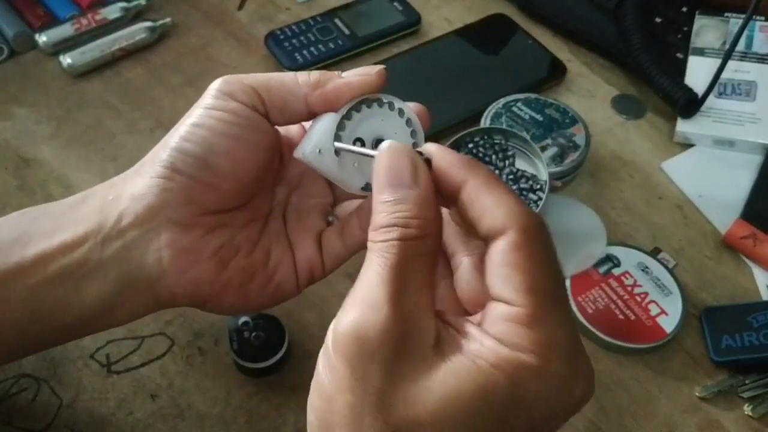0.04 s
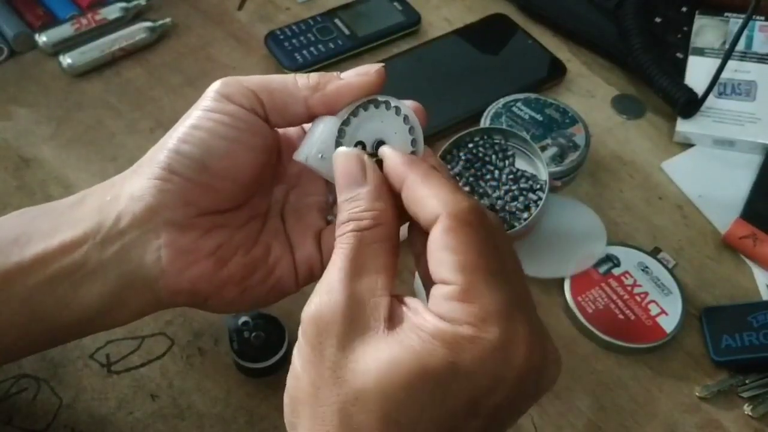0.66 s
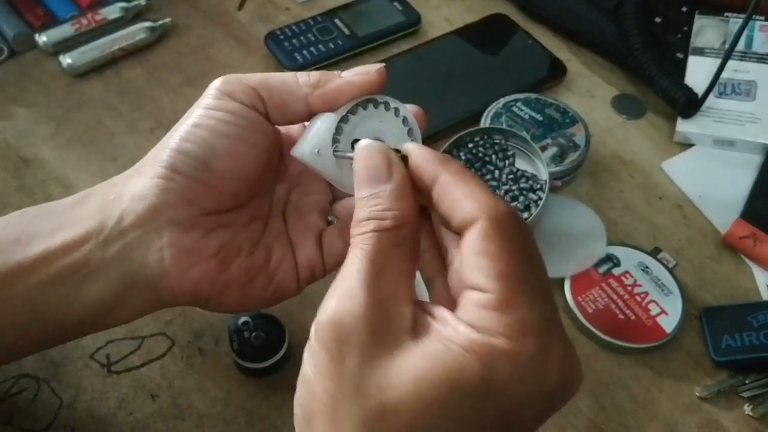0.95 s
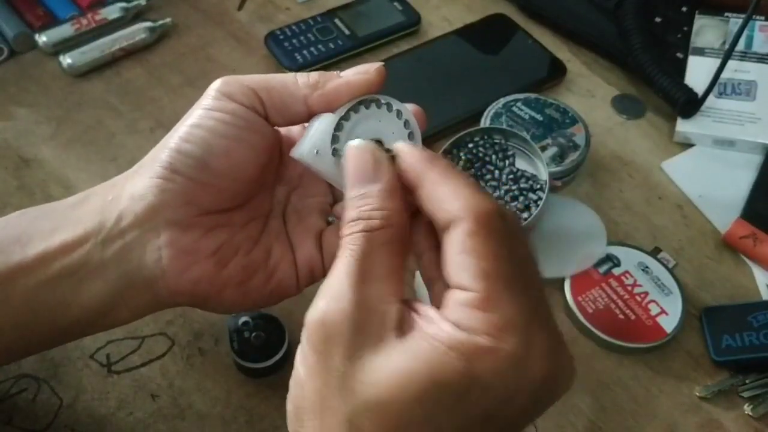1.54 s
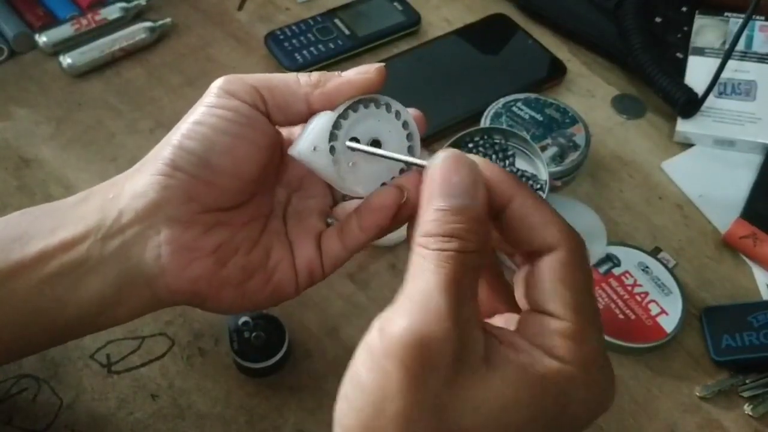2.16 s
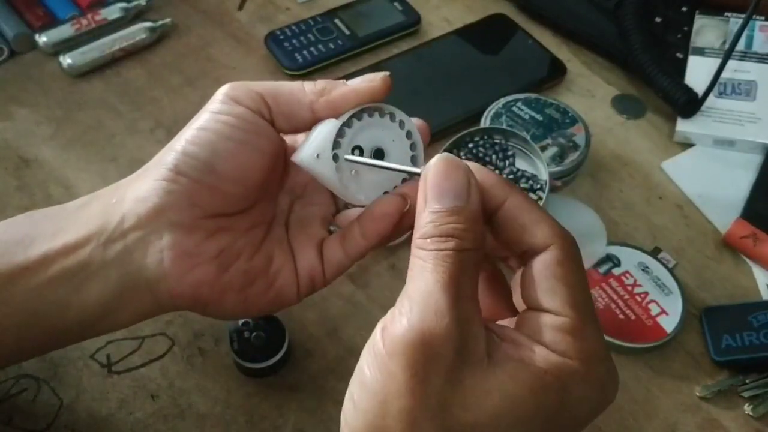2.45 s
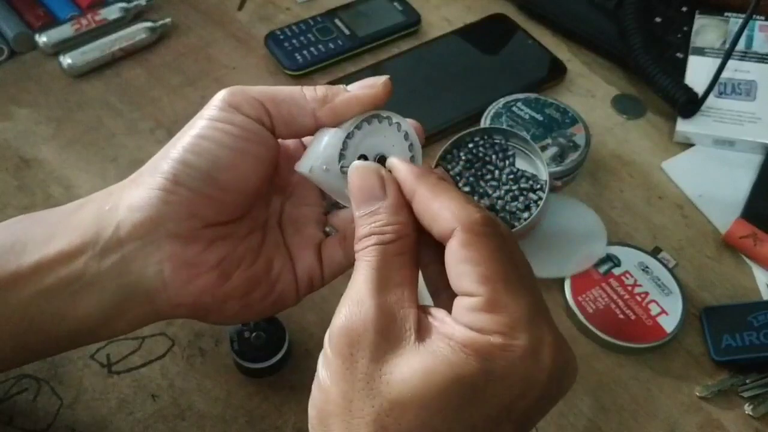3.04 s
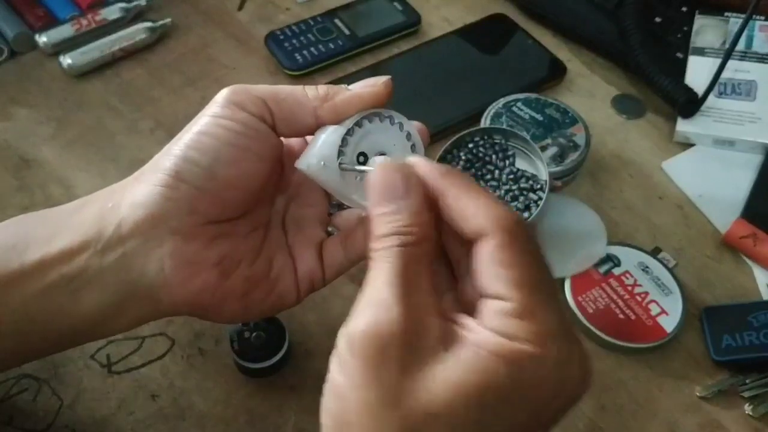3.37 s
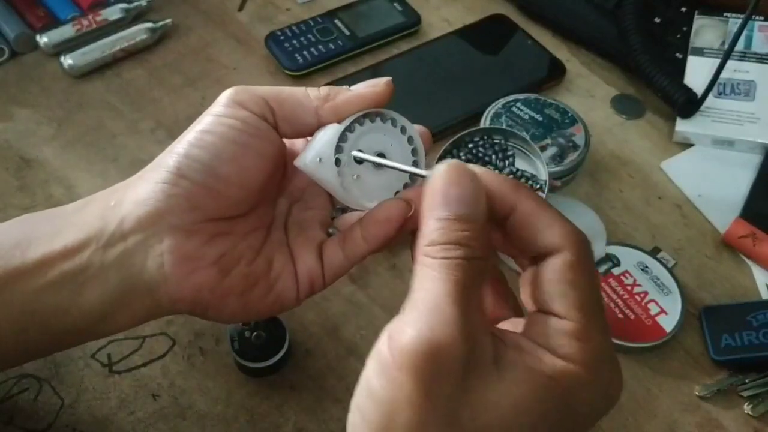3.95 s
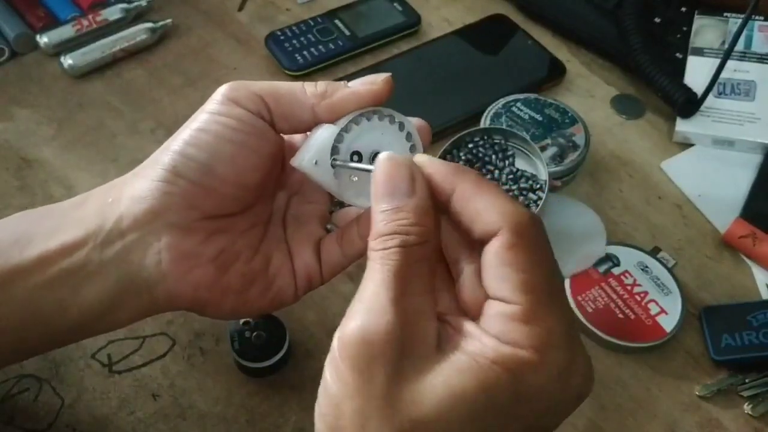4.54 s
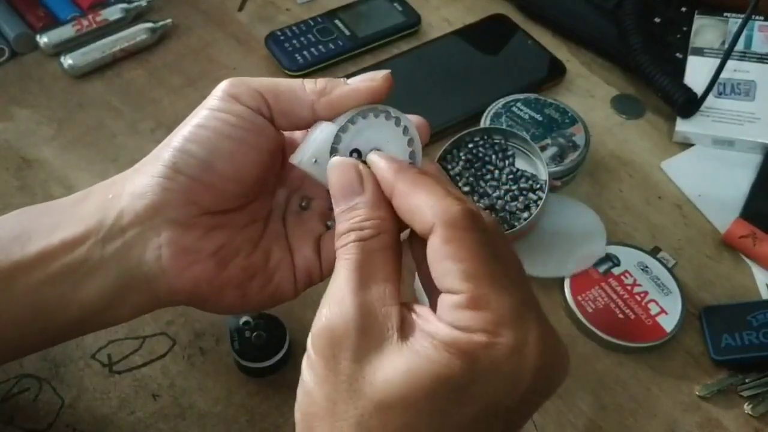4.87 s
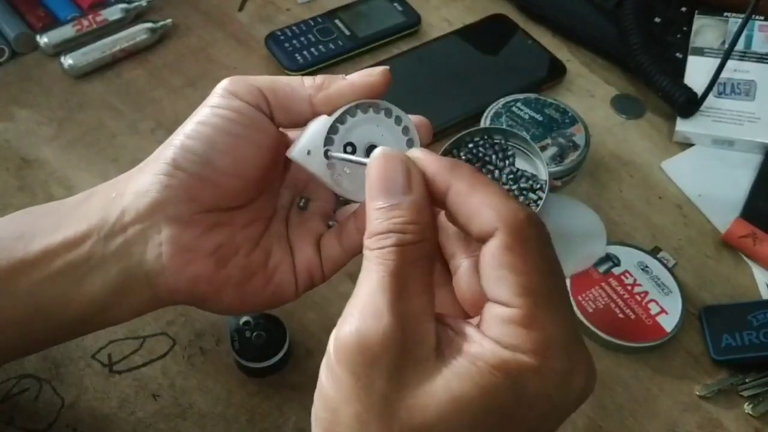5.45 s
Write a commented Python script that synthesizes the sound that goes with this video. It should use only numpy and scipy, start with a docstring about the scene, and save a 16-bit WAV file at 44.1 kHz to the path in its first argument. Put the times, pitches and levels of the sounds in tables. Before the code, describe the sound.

Close to the microphone, a plastic and metal pellet magazine clicks sharply every half second to a second or so while being loaded. Some clicks are doubled, and two leave a short metallic ring. Between them come soft hollow taps, pellet ticks and short plastic rubs, and a few light taps finish the sequence. A small room adds a short echo, with quiet rumble and hiss underneath.

```python
"""In a small, echoing room, pellets are thumbed into a hand-held rotary magazine, heard close up.
Its cover and its spring-loaded rotor (the wheel that holds the pellets) scrape round and snap against
their stops, which makes the plastic and metal parts ring. Pellets tick lightly in the chambers.
Behind it all lie a low room rumble, a faint hum that comes and goes, and hiss."""
import sys
import numpy as np
from scipy import signal
from scipy.fft import rfft, irfft
from scipy.io import wavfile
from scipy.ndimage import uniform_filter1d

SR = 44100
rng = np.random.default_rng(int(sys.argv[2]) if len(sys.argv) > 2 else 0)


def dump_mix(stems):
    """Bounce the given channels to the path in sys.argv[1] as a 16-bit WAV at rate SR."""
    frames = np.atleast_2d(stems).T  # one column per channel
    limited = np.clip(frames, -1, 1)  # hard clip at full scale
    pcm = np.round(limited * 32767).astype(np.int16)
    wavfile.write(sys.argv[1], SR, pcm)


N = 251811
TIME = np.arange(N) / SR

# hard snaps of the rotor: time_s, force_db, metal_db, rotor_pitch_hz, room_boost_db
SNAPS = [ (0.0434, 2, -15.5, 4030, -3), (0.6552, -5, -16.5, 4000, -13), (0.6694, -2, -14.5, 3840, 3.5),
         (1.1144, 1.5, -13.5, 3800, -3), (1.676, 0.5, -19.5, 3610, -7.5), (2.085, 3.5, -13, 3280, -2),
         (2.8726, 1, -20.5, 3900, -15), (2.8787, -2.5, -17, 4180, -2.5), (3.4801, 4, -14, 3750, -3),
         (4.7037, -2.5, -19, 3860, -6), (4.711, -2.5, -19.5, 3930, -3), (5.0888, 4.5, -14, 3370, -3.5)]
# light touches: time_s, level_db, hardness (0 is a dull tap on plastic, 1 is a metal tick)
TICKS = [ (.556, -44, .05), (.628, -30, 0.42), (0.6432, -30.5, 0.36), (0.728, -32, 1), (0.9675, -40, .35),
         (1.5, -34, .15), (1.578, -34, 0.94), (1.626, -37, 1), (2.7708, -33, 0.045), (2.7822, -35, 0.076),
         (2.852, -35, .45), (2.856, -27.5, .5), (3.44, -35.5, 0.86), (3.454, -34, 1), (4.449, -49, 0),
         (4.561, -45.5, .03), (4.6053, -32.5, .05), (4.616, -39, 0.87), (4.678, -29.5, .1), (4.684, -30, 1),
         (5.0175, -36, .03), (5.06, -41.5, 0.92), (5.5864, -37.5, .2), (5.621, -28.5, 0.24),
         (5.695, -30, 0.49), (5.6993, -26.5, 0.47)]
# the cover rubbing as it turns: start_s, end_s, start_db, end_db, shell_over_rotor_db
RUBS = [(1.597, 1.631, -42, -33.5, 0.5), (3.307, 3.428, -60.5, -38, 5), (3.436, 3.476, -37.5, -45, -1),
        (4.673, 4.691, -37.5, -29, 0), (5.009, 5.062, -50, -51, 1)]
# long rings that follow two of the snaps: start_s, pitch_hz, width_hz, level_db, time_to_fade_60_db_s
RINGS = [(.675, 9700, 5400, -31, 0.78), (5.092, 3430, 750, -35.5, 0.83)]
# the tones each part rings at: pitch_hz, width_hz, relative_db, left_over_right_db, left_delay_ms
SHELL_TONES = [(1146, 680, -11, -1, 0.28), (1870, 1100, -2, 1, 0.057), (2130, 410, -2.5, 0.5, 0.12)]   # the plastic shell, hit hard
TAP_TONES = [(1300, 600, -21, -3, .08), (1900, 660, 0, 0, .06)]   # the same shell, touched lightly: a hollow tap
ROTOR_TONES = [(3220, 900, -6.5, -2, 0.11), (3800, 570, -3.5, 9.5, 0.16), (4390, 710, -2.5, 4.5, 0.1),
               (5400, 1900, -11.5, 0.5, 0.073)]
METAL_TONES = [(7900, 2700, 5, -2, 0.002), (8890, 900, -2, -12, 0.054), (11800, 1540, 2, -4, 0.032),
               (13700, 3460, -4, -6.5, 0.045)]
# how strong the room's echo is, from low to high: pitch_hz, relative_db
ROOM_COLOUR = [(300, -7), (1000, 1.5), (2000, -2.5), (4000, -1), (6000, 0), (7600, -2), (10500, 2),
               (15000, 0.5)]
# how long the room's echo lasts: pitch_hz, time_to_fade_60_db_s
ROOM_FADE = [(300, 0.47), (2000, 0.93), (5000, 0.79), (9000, 0.72), (15000, 0.65)]
# swells of the faint hum: middle_s, half_length_s, pitch_hz, level_db
HUMS = [(0.475, 0.12, 265.6, -45), (0.81, 0.11, 268.6, -53), (1.128, 0.47, 268.7, -56),
        (2.303, 0.17, 303, -57.5), (3.314, 0.14, 338.5, -54.5)]
# the background noise, from rumble up to hiss: pitch_hz, relative_db
NOISE_COLOUR = [(18, -93), (30, -37), (95, -25.5), (140, -14.5), (182, -7.5), (219, -4), (277, -7.5),
                (307, -10.5), (332, -12), (575, -12.5), (852, -20.5), (1170, -19), (2020, -22), (2690, -22),
                (15500, -29)]
# how alike that noise is left and right: pitch_hz, likeness (0 or less is unrelated, 1 is the same)
NOISE_LIKENESS = [(60, 0.89), (180, 0.89), (550, 0.42), (1650, -0.37), (4970, -1.16), (15000, -0.02)]

HIT_SAMPLES, LEAD_SAMPLES = 2048, 640   # the length of one hit, and the part before the blow lands
HIT_TIME = (np.arange(HIT_SAMPLES) - LEAD_SAMPLES) / SR   # seconds, with the blow at 0


def rotor_snaps():
    """The spring drives the rotor into its stop. The hands move, so each snap has its own echoes."""
    out = np.zeros((2, N))
    for time_s, force_db, metal_db, rotor_hz, room_boost_db in SNAPS:
        parts = [(SHELL_TONES, 1, -20.5 + 0.73 * force_db, .0011),
                 (ROTOR_TONES, rotor_hz / ROTOR_TONES[1][0], -19.5 + 1.26 * force_db, .0012),
                 (METAL_TONES, 1, metal_db, .0022)]
        slide_s = 0.0069 * 2 ** (force_db / 12)   # a harder snap has slid for longer
        snap = hit(parts, slide_s, scrape_db=-7.5, blow=4.4, apart=0.53, grip_db=1.0)
        # the walls get mostly the all-round average, with a little of the snap's own colour
        to_walls = from_db(-7.5) * snap + from_db(-1.0) * all_round(snap, blur_hz=750)
        start = round(time_s * SR) - LEAD_SAMPLES
        add(out, snap + jolt(-31.5 + 0.51 * force_db, fade_s=0.0069), start)
        add(out, from_db(-9.5) * near_echoes(snap, first_s=0.0012, fade_s=0.027, per_s=1600), start)
        add(out, from_db(room_boost_db - 8.5) * room_echo(to_walls, build_s=0.01), start)
    return out


def jolt(level_db, fade_s):
    """The whole magazine jolts in the hand: a weak, dull puff under the snap."""
    dull = signal.butter(1, [120, 900], "band", fs=SR, output="sos")
    puff = stereo_noise(HIT_SAMPLES, apart=0.24) * np.exp(-np.abs(HIT_TIME) / fade_s)
    return from_db(level_db) * signal.sosfilt(dull, puff)


def rotor_bounces(count, gap_s, first_db, loss_db):
    """After each snap the rotor bounces off its stop, unevenly and more weakly each time."""
    out = np.zeros((2, N))
    for snap_s, *_ in SNAPS:
        gaps = gap_s * (1 + .2 * rng.uniform(-1, 1, count))
        for bounce, time_s in enumerate(snap_s + np.cumsum(gaps)):
            add(out, touch(first_db - loss_db * bounce, hardness=0.89), round(time_s * SR) - LEAD_SAMPLES)
    return out


def long_rings(rise_s, grit_db):
    """A gritty cluster of close, slowly fading tones hangs on after a sharp snap."""
    out = np.zeros((2, N))
    t = np.arange(SR) / SR
    for start_s, hz, width_hz, level_db, fade_s in RINGS:
        band = signal.butter(2, [hz - width_hz / 2, hz + width_hz / 2], "band", fs=SR, output="sos")
        grit = from_db(grit_db * unit_level(uniform_filter1d(rng.standard_normal(SR), size=130)))
        cluster = unit_level(signal.sosfilt(band, grit * stereo_noise(SR, apart=.9)))
        loudness = from_db(level_db - 60 * t / fade_s) * (1 - np.exp(-t / rise_s))
        add(out, cluster * loudness, round(start_s * SR))
    return out


def light_ticks(settle_s, softer_db):
    """Pellets, cover and rotor touch lightly, then settle with a second, fainter tick."""
    out = np.zeros((2, N))
    for time_s, level_db, hardness in TICKS:
        add(out, touch(level_db, hardness), round(time_s * SR) - LEAD_SAMPLES)
        settle = touch(level_db - softer_db, hardness=0.73)
        add(out, settle, round((time_s + settle_s) * SR) - LEAD_SAMPLES)
    return out


def cover_rubs(slips_per_s, spread_db):
    """The cover turns: many tiny slips of plastic on plastic ring the shell, rotor and metal."""
    out = np.zeros((2, N))
    for start_s, end_s, start_db, end_db, shell_db in RUBS:
        length = int((end_s - start_s) * SR)
        slips = (rng.random(length) < slips_per_s / SR) * from_db(spread_db * rng.standard_normal(length))
        force = np.pad(slips * stereo_noise(length, apart=0.7), ((0, 0), (0, LEAD_SAMPLES)))
        rub = 0
        for part_db, tones in (shell_db, TAP_TONES), (0, ROTOR_TONES), (0, METAL_TONES):
            rub = rub + from_db(part_db) * unit_level(ring(force, tones, pitch_ratio=0.97, grip_db=0.75))
        loudness = from_db(np.linspace(start_db, end_db, length + LEAD_SAMPLES))
        add(out, unit_level(rub) * loudness, round(start_s * SR))
    return out


def touch(level_db, hardness):
    """One light tap on the shell. The harder it is, the more the rotor and metal rattle instead."""
    parts = [(TAP_TONES, 1, level_db - 5 * hardness, .0006),
             (ROTOR_TONES, 1, level_db - 10.5 + 9.4 * hardness, .0018),
             (METAL_TONES, 1, level_db - 18.5 + 19 * hardness, .0021)]
    return hit(parts, slide_s=.002, scrape_db=-13, blow=4.0, apart=.18, grip_db=1.5)


def hit(parts, slide_s, scrape_db, blow, apart, grip_db):
    """A growing scrape, a blow and a dying rattle make each part ring."""
    t = HIT_TIME
    loudest = (t > -.0007) & (t < .0033)   # each part's level is set over these 4 ms
    scrape = from_db(scrape_db) * np.sqrt(np.clip(1 + t / slide_s, 0, 1))
    out = 0
    for tones, pitch_ratio, level_db, rattle_s in parts:
        strength = np.where(t < 0, scrape, np.exp(-np.abs(t) / rattle_s))
        force = strength * stereo_noise(HIT_SAMPLES, apart) + blow * (t == 0)
        ringing = ring(force, tones, pitch_ratio, grip_db)
        out = out + from_db(level_db) * ringing / ringing[:, loudest].std()
    return out


def ring(force, tones, pitch_ratio, grip_db):
    """A pushed part rings at its own tones. The fingers muffle each a little differently every time."""
    hz = np.maximum(np.fft.rfftfreq(force.shape[1], 1 / SR), 1)
    side = np.array([[.5], [-.5]])   # left, right
    response = 0
    for pitch_hz, width_hz, level_db, left_db, delay_ms in tones:
        gain = from_db(level_db + side * left_db + grip_db * rng.standard_normal())
        peak = gain / (1 + 1j * (hz - (pitch_ratio * pitch_hz) ** 2 / hz) / width_hz) ** 2
        response = response + peak * np.exp(-2j * np.pi * hz * side * delay_ms / 1000)
    return irfft(rfft(force) * response, force.shape[1])


def all_round(sound, blur_hz):
    """Averaged over all directions, the fine peaks and dips in a hit's tone even out."""
    power = np.mean(np.abs(rfft(sound)) ** 2, axis=0)
    smooth = uniform_filter1d(power, int(blur_hz * HIT_SAMPLES / SR) + 1)
    click = np.roll(irfft(np.sqrt(np.abs(smooth))), LEAD_SAMPLES)
    return np.tile(click, (2, 1))


def near_echoes(sound, first_s, fade_s, per_s):
    """Quick, separate echoes come off the hands, the desk and the things on it."""
    t = np.arange(SR // 8) / SR
    arrivals = (rng.random(len(t)) < per_s / SR) * (t > first_s)
    echoes = stereo_noise(len(t), apart=1.0) * arrivals * np.exp(-t / fade_s)
    return signal.fftconvolve(sound, unit_level(echoes) / np.sqrt(len(t)), axes=1)


def room_echo(sound, build_s):
    """Echoes off the walls blur into a tail that builds up, then fades, lingering in the middle pitches."""
    hz, t, noise = signal.stft(stereo_noise(SR * 3 // 4, apart=.9), SR, nperseg=256)
    fade_db = at_pitch(ROOM_COLOUR, hz)[:, None] - 60 * t / at_pitch(ROOM_FADE, hz)[:, None]
    tail = signal.istft(noise * from_db(fade_db) * (1 - np.exp(-t / build_s)), SR)[1]
    tail = unit_level(tail) / np.sqrt(2 * tail.shape[1])
    from_other_side = signal.fftconvolve(sound[::-1], tail[::-1] * [[1], [-1]], axes=1)
    return signal.fftconvolve(sound, tail, axes=1) + from_other_side


def rumble_and_hiss(level_db, rumble_hz, rumble_width_hz, rumble_boost_db):
    """A low room rumble, much the same in both ears, lies under a steady hiss."""
    hz = np.fft.rfftfreq(N, 1 / SR)
    shared, opposite = rfft(rng.standard_normal((2, N)))
    alike = np.clip(at_pitch(NOISE_LIKENESS, hz), 0, 1)
    noise = np.sqrt(1 + alike) * shared + np.sqrt(1 - alike) * opposite * [[1], [-1]]
    bump_db = rumble_boost_db * np.exp(-((hz - rumble_hz) / rumble_width_hz) ** 2)
    colour = from_db(at_pitch(NOISE_COLOUR, hz) + bump_db)
    return from_db(level_db) * unit_level(irfft(noise * colour, N))


def hum():
    """A faint low tone swells and fades."""
    out = np.zeros(N)
    for middle_s, half_s, hz, level_db in HUMS:
        swell = np.cos(np.pi / 2 * np.clip((TIME - middle_s) / half_s, -1, 1))
        out += from_db(level_db) * np.sqrt(2) * swell * np.sin(2 * np.pi * (hz * TIME + rng.random()))
    return out


def stereo_noise(length, apart):
    """Noise that is the same in both ears (apart=0), unrelated (apart=1) or in between."""
    shared, left, right = rng.standard_normal((3, length))
    return np.sqrt(1 - apart) * shared + np.sqrt(apart) * np.array([left, right])


def from_db(db):
    """Turn decibels into a number to multiply by."""
    return 10 ** (np.asarray(db) / 20)


def unit_level(sound):
    """Scale a sound so that its average (RMS) level is 1."""
    return sound / np.sqrt(np.mean(sound ** 2) + 1e-20)


def at_pitch(table, hz):
    """Read between a table's rows, giving every octave equal space."""
    pitches, values = np.array(table).T
    return np.interp(np.log(np.maximum(hz, 1)), np.log(pitches), values)


def add(out, sound, start):
    """Mix a stereo sound in from a given sample on."""
    first, last = max(start, 0), min(start + sound.shape[1], N)
    out[:, first:last] += sound[:, first - start:last - start]


def scene():
    """The magazine close by, its echoes and the room behind it."""
    quiet = light_ticks(settle_s=0.01, softer_db=13.5)
    quiet += rotor_bounces(count=3, gap_s=.0115, first_db=-29.5, loss_db=3)
    quiet += cover_rubs(slips_per_s=1500, spread_db=0.5)
    out = rotor_snaps() + long_rings(rise_s=0.039, grit_db=0.5) + quiet
    add(out, from_db(-11) * near_echoes(quiet, first_s=.003, fade_s=.02, per_s=2500), 0)
    add(out, from_db(-9.5) * room_echo(quiet, build_s=0.0021), 0)
    out += rumble_and_hiss(level_db=-49.5, rumble_hz=228, rumble_width_hz=87, rumble_boost_db=3.0)
    return out + hum()


def record(dry):
    """Flatten the highest peaks, thin the deep bass and cut the very top of the treble."""
    clipped = np.clip(dry, -1.2, 1.2)
    thinned = signal.sosfilt(signal.butter(1, 35, "high", fs=SR, output="sos"), clipped)
    return signal.sosfiltfilt(signal.butter(24, 15700, "low", fs=SR, output="sos"), thinned)


dry = scene()
out = record(dry)
dump_mix(out)
```